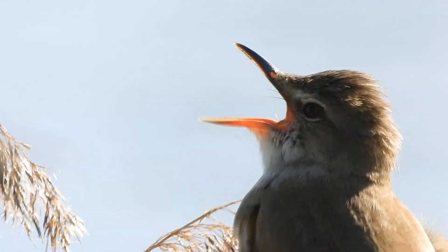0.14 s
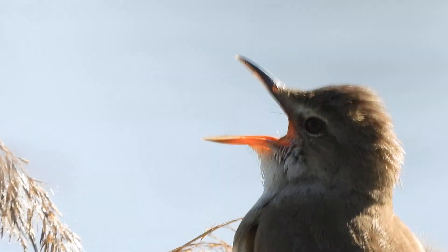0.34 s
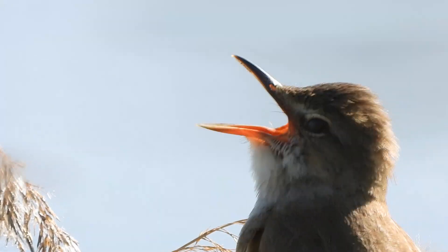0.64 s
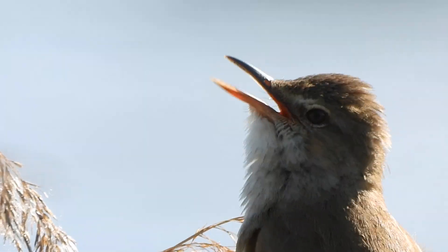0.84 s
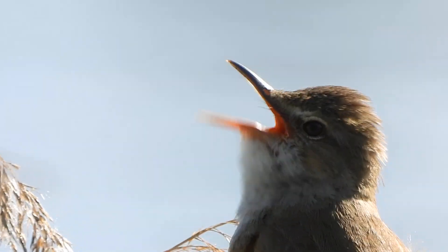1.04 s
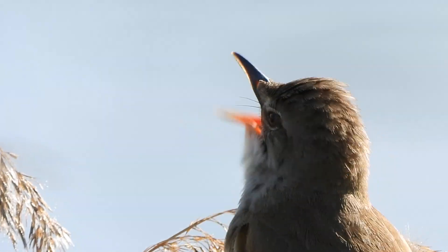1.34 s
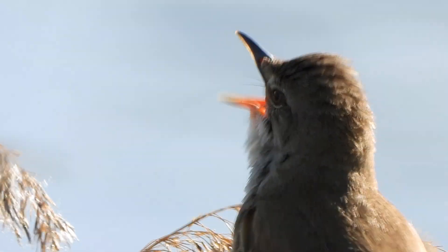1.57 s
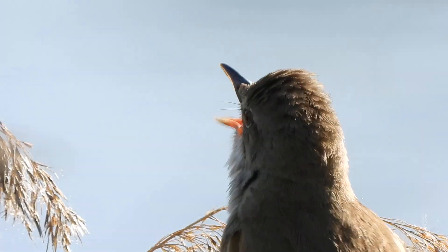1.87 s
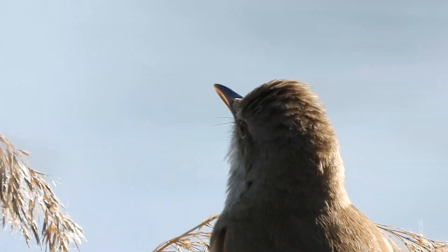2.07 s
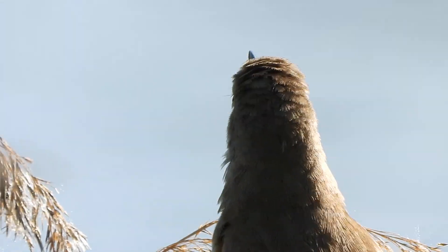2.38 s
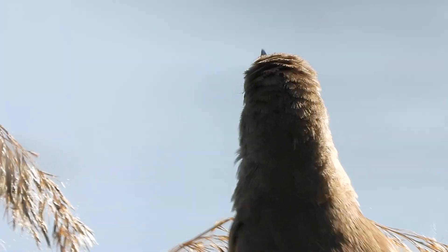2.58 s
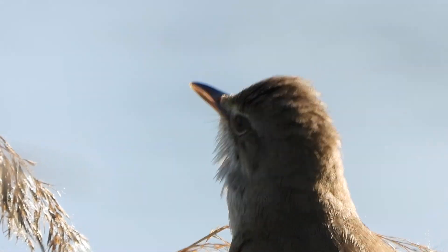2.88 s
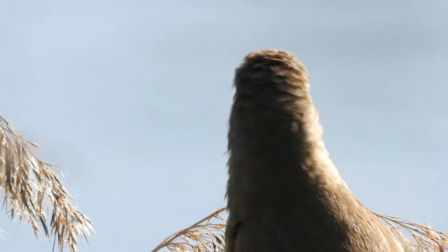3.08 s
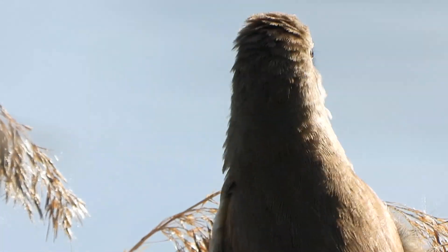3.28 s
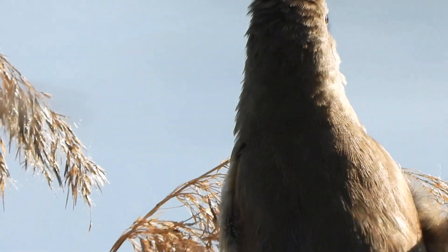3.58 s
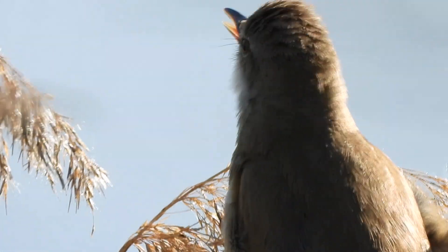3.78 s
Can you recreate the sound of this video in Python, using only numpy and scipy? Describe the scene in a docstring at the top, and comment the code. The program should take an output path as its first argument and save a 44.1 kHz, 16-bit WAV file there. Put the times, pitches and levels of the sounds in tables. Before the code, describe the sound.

A reed warbler sings close to the stereo microphones. At 0.14 and 0.4 s a scratchy upward chip leads into a steady nasal squeal. From 0.75 to 2.1 s come five pairs of harsh, high, rattling rasps; from 2.35 s to the end, eight quick pairs of low, throaty croaks. Short reed reflections, soft wind and a faint low drone surround it, with a barely audible hoot near 2 s, plop at 2.5 s and tick at 3.3 s.

```python
"""First a soft wind in a reed bed over a low, distant drone: stereo noise with drifting patches.
Close to the microphones a reed warbler then sings in trembling harmonics: two chips, each followed by a
nasal squeal, five pairs of harsh rasps and eight pairs of low croaks. Chips, rasps and croaks break into
pulses; squeals fray at the end. Near surfaces and reeds scatter the song by short echoes and decaying
noise; one dry tick, a small plop and two faint far calls (trembling sines) join it."""
import sys
import numpy as np
from scipy import signal
from scipy.fft import rfft, irfft
from scipy.io import wavfile
from scipy.ndimage import uniform_filter1d

SR = 44100
rng = np.random.default_rng(int(sys.argv[2]) if len(sys.argv) > 2 else 0)


def generate_wav(sig):
    """Save sig (samples, or channels by samples) to the path in sys.argv[1] as 16-bit PCM at SR."""
    pcm = np.round(np.clip(np.atleast_2d(sig).T, -1, 1) * 32767).astype(np.int16)
    wavfile.write(sys.argv[1], SR, pcm)


N = 172872  # length in samples


def amp(db):
    """Decibels to gain."""
    return 10 ** (np.asarray(db) / 20)


def unit(x):
    """Scales to rms 1."""
    return x / np.sqrt(np.mean(x ** 2) + 1e-20)


def read(points, hz):
    """Reads a spectrum, interpolated on a log-frequency axis."""
    f, value = np.transpose(points)
    return np.interp(np.log(hz + 1), np.log(f + 1), value)


def add(mix, s, sound):
    """Adds a sound at time s."""
    part = mix[max(round(s * SR), 0):][:len(sound)]
    part += sound[:len(part)]


def colour(x, points):
    """Filters by a spectrum in dB."""
    n = x.shape[-1]
    return irfft(rfft(x) * amp(read(points, np.fft.rfftfreq(n, 1 / SR))), n)


def tilt(x, points):
    """Left-right balance by frequency, half the difference to each side."""
    half = read(points, np.fft.rfftfreq(N, 1 / SR)) / 2
    return irfft(rfft(x) * amp([half, -half]), N)


def noise(n):
    """White noise for one note."""
    return rng.standard_normal(size=16384)[:n]


def wobble(n, hz):
    """Smooth random motion: noise under a Gaussian low-pass, cut from a stretch of rms 1."""
    f = np.fft.rfftfreq(16384, 1 / SR)
    smooth = irfft(rfft(rng.standard_normal(size=16384)) * np.exp(-(f / hz) ** 2))
    return unit(smooth)[:n]


def phase_of(hz, jitter, rate_hz):
    """Phase of a tone whose pitch trembles by a share of itself."""
    return 2 * np.pi * np.cumsum(hz * (1 + jitter * wobble(len(hz), rate_hz))) / SR


def partials(phase, levels_db):
    """Harmonics on one phase, from the fundamental up."""
    waves = sum(amp(db) * np.sin((k + 1) * phase) for k, db in enumerate(levels_db))
    return waves * np.sqrt(2)


def soft_ends(t, ramp_s):
    """Fades a note in and out."""
    return np.clip(np.minimum(t - t[0], t[-1] - t) / ramp_s, 0, 1)


BREAK_RAMP_S = .0018


def after(t, s):
    """A quick, smooth step from 0 to 1, centred on time s."""
    return .5 + .5 * np.sin(np.pi * np.clip((t - s) / BREAK_RAMP_S, -.5, .5))


# Left-right likeness of the air at the microphones: f/Hz, likeness (held within -1 to 1)
LIKENESS = [(60, 3), (200, 0.9), (1000, 0.91), (3000, 0.4), (6000, -0.5), (11000, -0.1)]
MURMUR_DB, MURMUR_TOP_HZ = 3, 1800


def bed(spectrum, patchy_db):
    """Stereo noise with wide drifting patches and, low down, a murmur in narrower bands."""
    hz = np.fft.rfftfreq(1024, 1 / SR)
    a, b, c, d, patches, murmur = rng.standard_normal((6, 513, N // 256 + 5))
    # smoothed over frequency, then over time
    murmur = unit(uniform_filter1d(uniform_filter1d(murmur, size=3, axis=0), size=14, axis=1))
    patches = unit(uniform_filter1d(uniform_filter1d(patches, size=8, axis=0), size=12, axis=1))
    motion_db = patchy_db * patches + MURMUR_DB * (hz < MURMUR_TOP_HZ)[:, None] * murmur
    same = np.clip(read(LIKENESS, hz), -1, 1)[:, None]
    left = a + 1j * b
    right = same * left + np.sqrt(1 - same ** 2) * (c + 1j * d)
    z = np.array([left, right]) * amp(read(spectrum, hz)[:, None] + motion_db)
    return unit(signal.istft(z, nperseg=1024, noverlap=768)[1][:, :N])


# Balance of the marsh around the microphones: f/Hz, left minus right level/dB
MARSH_TILT = [(200, 0.2), (650, 0.5), (1200, -2), (3500, -0.5), (7000, -4.5)]


def marsh_balance(x):
    """The surroundings lean left or right by frequency."""
    return tilt(x, MARSH_TILT)


# Spectrum of the wind in the reeds: f/Hz, relative level/dB per Hz
WIND = [(180, -43.5), (300, -10.5), (628, -7), (937, -1.5), (1820, -10), (2710, -17.5), (4500, -20.5),
        (10600, -39.5), (11900, -50.5), (15400, -72)]
# Further shaping of the wind: f/Hz, gain/dB
WIND_TRIM = [(30, -24.5), (150, -0.5), (11000, 2), (12500, -10)]
# Spectrum of the low, distant drone: f/Hz, relative level/dB per Hz
DRONE_SPECTRUM = [(20, -53.5), (60, -53), (80, -35.5), (160, -18), (208, 10), (250, -16), (320, -9.5),
                  (450, -23.5), (650, -34), (1500, -90)]
# Course of the background: t/s, drone gain/dB, wind gain/dB (added to WIND_DB)
BREEZE_COURSE = [(0, -40.5, 5.5), (.5, -35.5, 2), (0.901, -42, 3), (1.7, -41, 1), (2.703, -44, 2),
                 (3.302, -44, -1), (3.92, -48, -0.5)]
WIND_DB, WIND_PATCHY_DB = -37, 1.8


def background():
    """Soft noise of wind in the reeds over low drone noise that swells early and then fades."""
    s, drone_db, wind_db = np.transpose(BREEZE_COURSE)
    t = np.arange(N) / SR
    wind = colour(bed(WIND, WIND_PATCHY_DB), WIND_TRIM)
    wind = amp(WIND_DB + np.interp(t, s, wind_db)) * wind
    drone = amp(np.interp(t, s, drone_db)) * bed(DRONE_SPECTRUM, patchy_db=0.5)
    return marsh_balance(wind + drone)


# Other birds, far off: start t/s, level/dB, pitch f/Hz, length/s, pitch jitter (share)
FAR_BIRDS = [(1.985, -30.5, 776, 0.07, .025), (3.879, -45, 4780, .08, .15)]


def far_call(start, db, hz, length, jitter):
    """A hoot or buzz from another bird far off: a trembling sine under a half-sine swell."""
    t = np.arange(0, length, 1 / SR)
    phase = phase_of(np.full(len(t), hz), jitter, rate_hz=hz / 4)
    return start, amp(db) * np.sin(np.pi * t / length) * np.sin(phase)


# Plops among the stems: start t/s, level/dB, pitch f/Hz
STEM_PLOPS = [(2.476, -22.5, 1057)]
PLOP_DECAY_S = 0.0029


def plop(start, db, hz):
    """A small, dull plop, as of water among the stems: a trembling sine that dies quickly."""
    t = np.arange(0, .02, 1 / SR)
    level = t / PLOP_DECAY_S * np.exp(1 - t / PLOP_DECAY_S)
    return start, amp(db) * level * np.sin(phase_of(np.full(len(t), hz), 0.13, rate_hz=230))


# Reflections close to the bird: delay t/s, gain left, gain right (signed, linear)
NEAR_ECHOES = [(.00133, 0.45, 0.14), (.00298, -0.24, -0.21), (.00428, -0.049, 0.055), (.00553, -.42, -.42),
               (.00583, -0.13, -0.27)]
# Fading of the reed bed: f/Hz, time to fall 60 dB/s
REED_T60 = [(500, .4), (2200, .34), (4200, .42), (6000, .3), (11000, .2)]
# Phase lead of the left microphone on the direct song and its echoes: f/Hz, phase/rad
LEFT_LEAD = [(1200, -1), (2200, 0.28), (3200, 0.45), (4300, 0.45), (5200, 0.88), (7700, 1.35),
             (11500, 2.02)]
TAIL_DB, STEMS_DB, STEMS_T60_S = -16.5, -4.5, 0.063
REEDS_LIKENESS = 0.24  # between left and right


def reed_bed(x):
    """A few near reflections, quick scatter off the stems and a faint long tail of sparse noise."""
    t = np.arange(SR) / SR
    a, b, c, d = rng.standard_normal((4, SR)) * (rng.random((4, SR)) < .1)
    same = REEDS_LIKENESS
    apart = np.sqrt(1 - same ** 2)
    stems = np.array([a, same * a + apart * b]) * amp(-60 * t / STEMS_T60_S) * (t > .003)
    tail = np.array([c, same * c + apart * d]) * (t > .015)
    hz, s, z = signal.stft(tail, SR, nperseg=256)
    z = z * amp(-60 * s / read(REED_T60, hz)[:, None])
    tail = signal.istft(z, SR, nperseg=256)[1][:, :SR]
    scatter = (amp(STEMS_DB) * unit(stems) + amp(TAIL_DB) * unit(tail)) / np.sqrt(SR)
    f = np.fft.rfftfreq(2 * N, 1 / SR)
    paths = 1 + sum(np.array([[left], [right]]) * np.exp(-2j * np.pi * f * delay)
                    for delay, left, right in NEAR_ECHOES)
    paths[0] *= np.exp(1j * read(LEFT_LEAD, f))
    near = irfft(rfft(x, 2 * N) * paths)[:, :N]
    return near + signal.fftconvolve(x[None], scatter, axes=1)[:, :N]


# Balance of the bird by pitch: f/Hz, left minus right level/dB
SONG_TILT = [(1000, 4.5), (1800, -1), (2200, 0.5), (3500, 3.5), (5500, 0.5), (11000, -1)]
# The bird turns its head: t/s, further left minus right level/dB
HEAD_TURN = [(.5, -2.2), (2.2, -3.5), (3.8, -2)]


def bird_balance(x):
    """The song's balance leans by frequency and drifts as the bird turns its head."""
    lean_db = np.interp(np.arange(N) / SR, *np.transpose(HEAD_TURN))
    return amp(np.array([[.5], [-.5]]) * lean_db) * tilt(x, SONG_TILT)


# Dry ticks close by: start t/s, relative level/dB, decay/s
DRY_TICKS = [(3.285, -30.5, .005)]
# Spectrum of a tick: f/Hz, relative level/dB
TICK_SPECTRUM = [(1500, -30.5), (3000, -0.5), (4500, 5), (5500, -7), (6700, 1), (8000, -10.5), (14000, -24)]


def tick(start, db, decay):
    """A dry tick, as of a stem or feather: coloured noise that decays at once."""
    t = np.arange(0, .05, 1 / SR)
    grain = unit(colour(noise(len(t)), TICK_SPECTRUM))
    return start, amp(db) * grain * np.exp(-t / decay) * soft_ends(t, ramp_s=.0003)


PULSE_SKEW, PULSE_SPREAD_DB = .65, 1.3


def pulses(n, rate_hz, jitter):
    """Uneven slaps of a membrane: their gate, the place in each slap (0-1) and a chance value for each."""
    turns = phase_of(np.full(n, rate_hz), jitter, rate_hz=300) / (2 * np.pi)
    size, chance = rng.standard_normal(size=(64, 2))[turns.astype(int)].T
    place = turns % 1
    slap = np.sin(np.pi * place ** PULSE_SKEW) ** 2
    return unit(amp(PULSE_SPREAD_DB * size) * slap), place, chance


# Throat colour of the scrape in chips and rasps: f/Hz, relative level/dB
SCRAPE_THROAT = [(600, -41.5), (1500, -15), (2250, -7), (2680, -57), (3000, -1.5), (4400, -3.5), (4800, -5),
                 (5800, -15), (9000, -57.5)]


def scrape(x):
    """Rough breath through the throat: coloured noise of rms 1."""
    return unit(colour(x, SCRAPE_THROAT))


# Chips: peak t/s, relative level/dB
CHIP_NOTES = [(0.142, -21.5), (0.402, -19.5)]
# Harmonics of a chip, from the fundamental up: relative level/dB
CHIP_HARMONICS = [-8.5, -2.5, -21]
CHIP_TOP_HZ, CHIP_RISE_HZ_PER_S, CHIP_JITTER = 2800, 24000, .025
CHIP_DECAY_S, CHIP_SCRAPE_DB = .0093, -12
CHIP_PULSE_HZ, CHIP_PULSE_JITTER = 260, .15


def chip(peak, db):
    """A short upward flick of pitch, broken into scratchy pulses."""
    t = np.arange(-.03, .012, 1 / SR)
    hz = CHIP_TOP_HZ + CHIP_RISE_HZ_PER_S * np.minimum(t, 0)
    tone = partials(phase_of(hz, CHIP_JITTER, rate_hz=660), CHIP_HARMONICS)
    level = np.exp(-abs(t) / CHIP_DECAY_S) * np.minimum((t[-1] - t) / 0.017, 1)
    level *= pulses(len(t), CHIP_PULSE_HZ, CHIP_PULSE_JITTER)[0]
    return peak + t[0], amp(db) * level * (tone + amp(CHIP_SCRAPE_DB) * scrape(noise(len(t))))


# Squeals, one curve each: t/s, pitch f/Hz, then relative level/dB of the 2nd, the 3rd and the higher harmonics
SQUEAL_CURVES = [
    [(0.19, 1488, -35.5, -38.5, -34), (0.262, 1503, -41.5, -28.5, -25), (0.325, 1541, -29.5, -33.5, -29.5)],
    [(0.445, 1492, -42, -30.5, -31.5), (0.545, 1520, -29.5, -27.5, -28), (0.575, 1460, -44, -27, -35)],
]
# Offsets of the squeal's harmonics, from the fundamental up: level/dB
SQUEAL_HARMONICS = [-16, 1.5, 0.5, -2.5, -22.5, -27, -26]
SQUEAL_JITTER, SQUEAL_AIR_DB = .0025, -18
FRAY_S, FRAY_DB = .02, -3  # the fray starts this long before the end


def squeal(curve):
    """A steady nasal note of clean harmonics; a wobbling off-harmonic sine frays its end."""
    s, *columns = np.transpose(curve)
    t = np.arange(s[0], s[-1], 1 / SR)
    hz, second, third, upper = (np.interp(t, s, c) for c in columns)
    phase = phase_of(hz, SQUEAL_JITTER, rate_hz=300)
    # the fundamental follows the course of the third harmonic
    courses = [third, second, third, upper, upper, upper, upper]
    levels = [course + offset for course, offset in zip(courses, SQUEAL_HARMONICS)]
    air = amp(SQUEAL_AIR_DB) * wobble(len(t), hz=940) * np.sin(4 * phase)
    fray = amp(FRAY_DB) * after(t, s[-1] - FRAY_S) * wobble(len(t), hz=870) * np.sin(3.4 * phase)
    voice = partials(phase, levels) + amp(upper) * (air + fray)
    return s[0], soft_ends(t, ramp_s=0.0092) * voice


# Rasps: start t/s, relative level/dB, reference pitch f/Hz, hiss level/dB (added to HISS_DB), tone breaks t/s
# after the start
RASP_NOTES = [(.746, -15, 3107, 2, .024), (0.855, -14, 3180, 2, 0.02), (1.028, -13.5, 3080, 1.5, .022),
              (1.142, -13.5, 3193, 2.5, .022), (1.326, -14.5, 3116, 1.5, 0.02),
              (1.445, -17, 3170, -2.5, 0.02), (1.622, -13.5, 3170, -3.5, 0.026),
              (1.741, -15, 3137, -3.5, 0.02), (1.918, -13.5, 3090, -1.5, 0.025),
              (2.045, -15, 3150, -3.5, 0.022)]
# Course of every rasp: t/s from its start, ratio to the reference pitch, level/dB
RASP_COURSE = [(0, 1.006, 4), (.004, .98, -2.5), (.007, .96, -7), (.012, 1, -1.5), (0.022, 1.03, 1.5),
               (.034, 1.05, -2), (.039, 1.22, -11.5), (.045, 1.41, -2), (.051, 1.39, 2), (0.059, 1.3, -9),
               (0.065, 0.9, -17.5)]
# Harmonics of a rasp, from the fundamental up: relative level/dB
RASP_HARMONICS = [-1.5, -44, -36]
# Throat colour of the rasp's tone and rattle: f/Hz, gain/dB
RASP_TONE_THROAT = [(1200, -3), (2150, -8.5), (2600, -5), (2950, -1), (4400, -2), (4900, -10.5), (6000, 5),
                    (12000, -18)]
# Spectrum of the rasp's hiss: f/Hz, relative level/dB
HISS_SPECTRUM = [(3000, -26.5), (5500, -4.5), (10500, -6.5), (11500, -17), (12400, -41)]
HISS_DB, SCRAPE_DB = -25.5, -10
TONE_NOISE_DB = -6  # change of scrape and hiss while the tone is unbroken
RASP_JITTER, RASP_FLUTTER = .028, .2
RASP_MEND_S, RASP_REBREAK_S = .039, .051
RATTLE_HZ, RATTLE_JITTER, RATTLE_DB = 420, .15, -2.5
RATTLE_LIFT, RATTLE_SAG, RATTLE_SCATTER = 1.17, 0.231, 0.0637  # pitch ratio, then shares of pitch


def rasp(start, db, hz, hiss_db, break_s):
    """A tone breaks into a rattle of falling pulses, catches again higher up, and breaks once more."""
    s, *columns = np.transpose(RASP_COURSE)
    t = np.arange(0, s[-1], 1 / SR)
    n = len(t)
    ratio, level_db = (np.interp(t, s, c) for c in columns)
    first = after(t, break_s) * (1 - after(t, RASP_MEND_S))
    broken = first + after(t, RASP_REBREAK_S)

    tone = partials(phase_of(hz * ratio, RASP_JITTER, rate_hz=550), RASP_HARMONICS)
    tone *= 1 + RASP_FLUTTER * wobble(n, hz=338)

    gate, place, chance = pulses(n, RATTLE_HZ, RATTLE_JITTER)
    fall = 1 + RATTLE_SAG * (1 / 3 - place) + RATTLE_SCATTER * chance
    ring_hz = hz * ratio * RATTLE_LIFT ** first * fall
    ring = partials(phase_of(ring_hz, RASP_JITTER, rate_hz=900), RASP_HARMONICS)
    rattle = amp(RATTLE_DB) * gate * ring

    rough = amp(SCRAPE_DB) * scrape(gate * noise(n))
    hiss = amp(HISS_DB + hiss_db) * unit(colour(np.sqrt(gate) * noise(n), HISS_SPECTRUM))
    voice = colour((1 - broken) * tone + broken * rattle, RASP_TONE_THROAT)
    voice += amp(TONE_NOISE_DB * (1 - broken)) * (rough + hiss)
    return start, amp(db + level_db) * soft_ends(t, ramp_s=.005) * voice


# Croaks: top t/s, relative level/dB, top pitch f/Hz, rise/s, break t/s after the top
CROAK_NOTES = [(2.359, -16, 1123, 0.025, .008), (2.420, -19, 1138, 0.031, -0.0015),
               (2.551, -16, 1118, 0.036, 0.0096), (2.608, -18, 1103, 0.027, 0.0032),
               (2.730, -14, 1138, .032, 0.013), (2.789, -16, 1115, 0.032, 0.0098),
               (2.927, -15.5, 1152, 0.032, 0.018), (2.988, -14, 1134, 0.024, .010),
               (3.123, -14.5, 1135, 0.033, .013), (3.182, -16, 1124, 0.033, 0.013),
               (3.338, -15, 1156, .036, .013), (3.399, -15.5, 1126, 0.035, 0.0038),
               (3.552, -15, 1159, 0.034, 0.016), (3.613, -17.5, 1153, 0.034, -0.0043),
               (3.775, -15.5, 1162, 0.032, 0.022), (3.837, -15, 1133, 0.027, 0.0072)]
# Throat colour of the croak's harmonics: f/Hz, level/dB
CROAK_RESONANCE = [(800, -38), (1150, -25), (1450, -12), (1720, -8), (2000, -3.5), (2230, -3), (2560, -19),
                   (3200, -18.5), (3450, -28), (3900, -48), (4500, -41)]
# Spectrum of the croak's breath: f/Hz, relative level/dB
CROAK_BREATH = [(100, -46.5), (600, -6.5), (1200, -9.5), (2100, 17.5), (2700, 7.5), (3200, -4), (3800, -19),
                (9000, -25), (10800, -17), (12000, -49)]
CROAK_FALL_S, CROAK_SAG = .023, .24  # sag as a share of the top pitch
CROAK_BEND, CROAK_FLATNESS = 2.278, 2.7
CROAK_EDGE_DB, CROAK_AIR_DB, CROAK_AIR_EDGE_DB = -13.5, -17.5, -2.5
CROAK_JITTER, CROAK_EDGE_JITTER, CROAK_FLUTTER, CROAK_EDGE_FLUTTER = 0.012, .028, 0.11, .25
CROAK_PULSE_HZ, CROAK_PULSE_JITTER, CROAK_PULSE_DB, CROAK_PULSE_SCATTER = 220, .2, -0.5, 0.0544
CROAK_CATCH = 0.54  # the clear tone catches this share of the rise before the top


def croak(top, db, top_hz, rise, break_s):
    """An arched pitch stutters, catches clear and breaks into pulses; harmonics sweep the throat colour."""
    t = np.arange(-1.2 * rise, 1.25 * CROAK_FALL_S, 1 / SR)
    n = len(t)
    away = abs(np.where(t < 0, t / rise, t / CROAK_FALL_S)) ** CROAK_FLATNESS
    slack = np.tanh(CROAK_BEND * away)
    broken = 1 - after(t, -CROAK_CATCH * rise) + after(t, break_s)
    # the pulses are mirrored in time about the break
    from_break = abs(np.arange(n) - np.searchsorted(t, break_s))
    gate, _, chance = (v[from_break] for v in pulses(n, CROAK_PULSE_HZ, CROAK_PULSE_JITTER))

    hz = top_hz * (1 - CROAK_SAG * slack)
    scattered_hz = hz * (1 + CROAK_PULSE_SCATTER * broken * chance)
    phase = phase_of(scattered_hz, CROAK_JITTER + CROAK_EDGE_JITTER * slack, rate_hz=400)
    voice = partials(phase, [read(CROAK_RESONANCE, k * hz) for k in range(1, 6)])
    flutter = CROAK_FLUTTER + CROAK_EDGE_FLUTTER * slack
    voice *= amp(CROAK_EDGE_DB * away) * (1 + flutter * wobble(n, hz=196))
    voice *= 1 - broken + broken * amp(CROAK_PULSE_DB) * gate

    # breath puffs once in each cycle of the voice
    breath = unit(colour(noise(n) * (1 + np.sin(phase)), CROAK_BREATH))
    breath *= amp(CROAK_AIR_DB + CROAK_AIR_EDGE_DB * away)
    return top + t[0], amp(db) * soft_ends(t, ramp_s=0.0019) * (voice + breath)


def scene():
    """The close song scattered by the reed bed, over the marsh's small sounds and background."""
    bird, marsh = np.zeros((2, N))
    for note, rows in ((far_call, FAR_BIRDS), (plop, STEM_PLOPS)):
        for row in rows:
            add(marsh, *note(*row))
    for note, rows in ((tick, DRY_TICKS), (chip, CHIP_NOTES), (rasp, RASP_NOTES), (croak, CROAK_NOTES)):
        for row in rows:
            add(bird, *note(*row))
    for curve in SQUEAL_CURVES:
        add(bird, *squeal(curve))
    song = bird_balance(reed_bed(amp(-1.5) * bird))
    return background() + marsh_balance(marsh) + song


EDGE_HZ = 15300


def record(dry):
    """The recorder's band limit: a steep low-pass."""
    low_pass = signal.firwin(511, EDGE_HZ, window=("kaiser", 9), fs=SR)
    return signal.oaconvolve(dry, low_pass[None], "same")


dry = scene()
out = record(dry)
generate_wav(out)
```